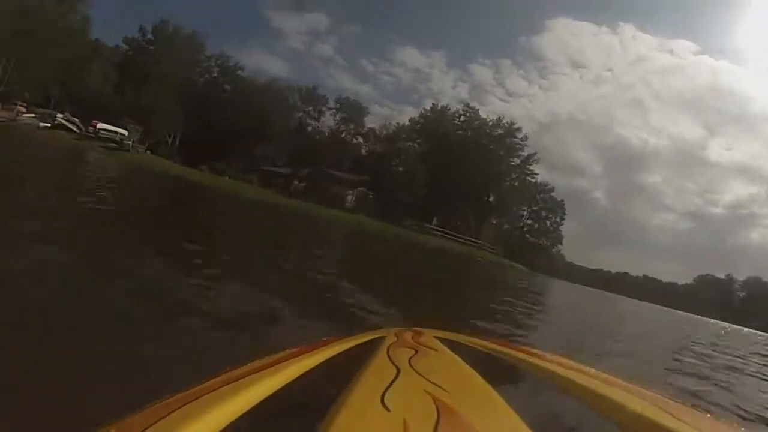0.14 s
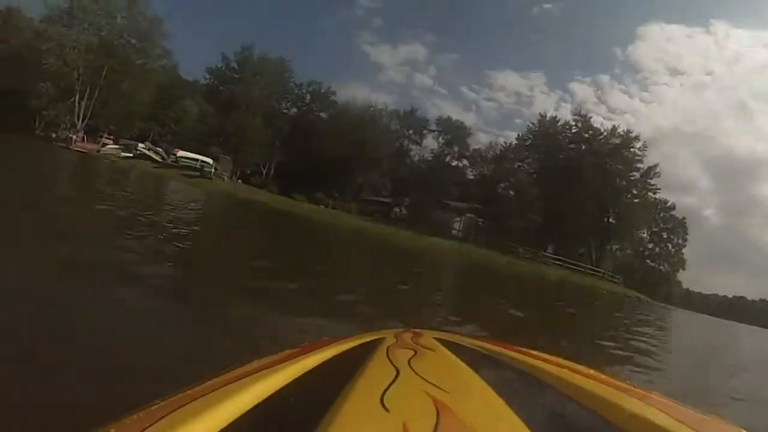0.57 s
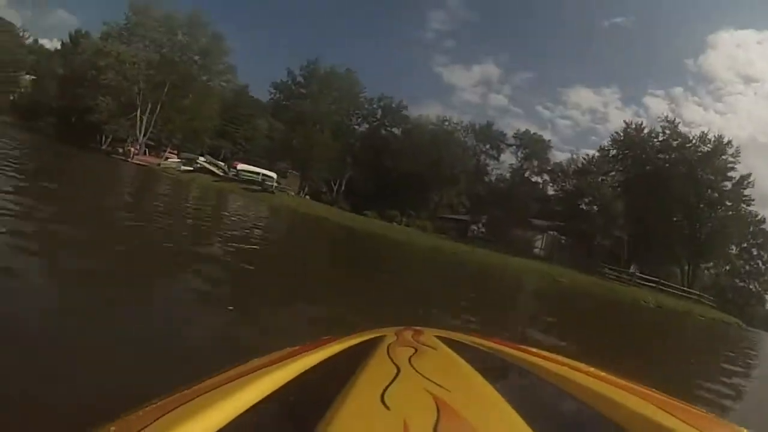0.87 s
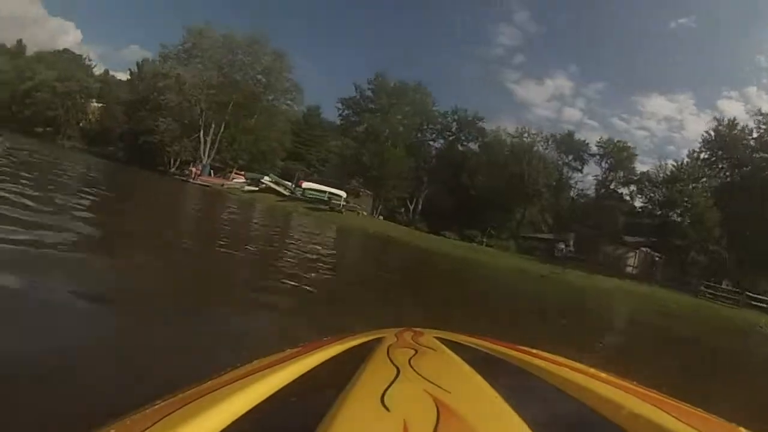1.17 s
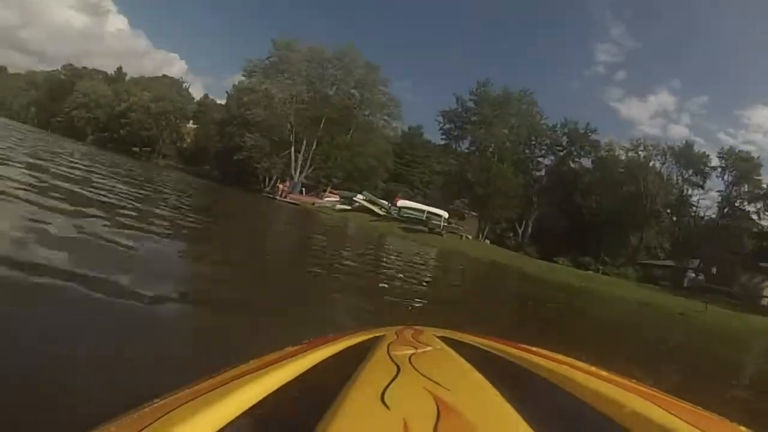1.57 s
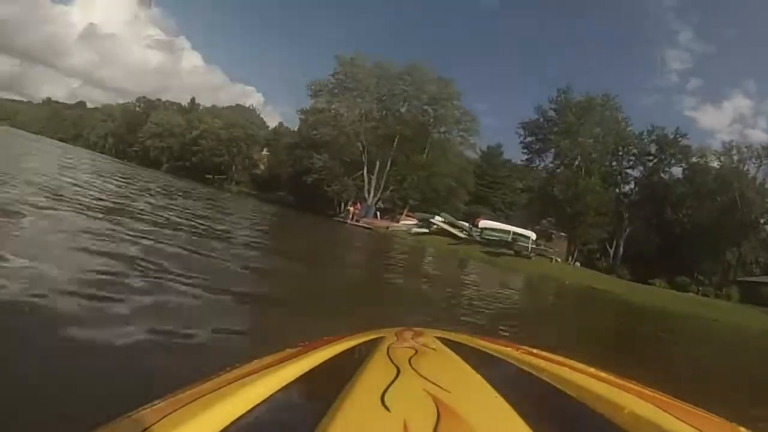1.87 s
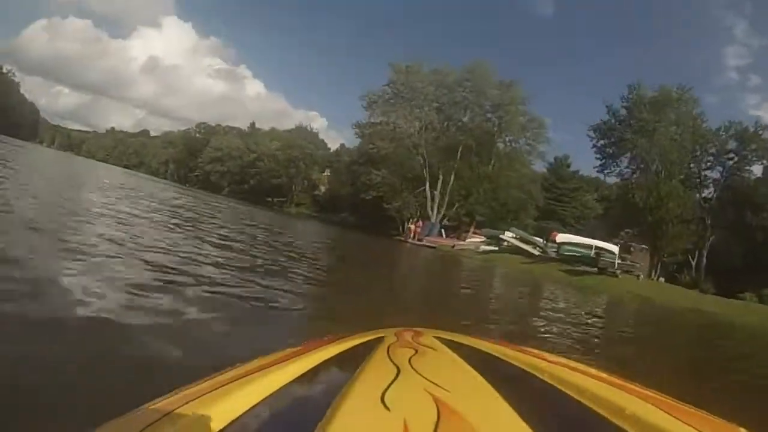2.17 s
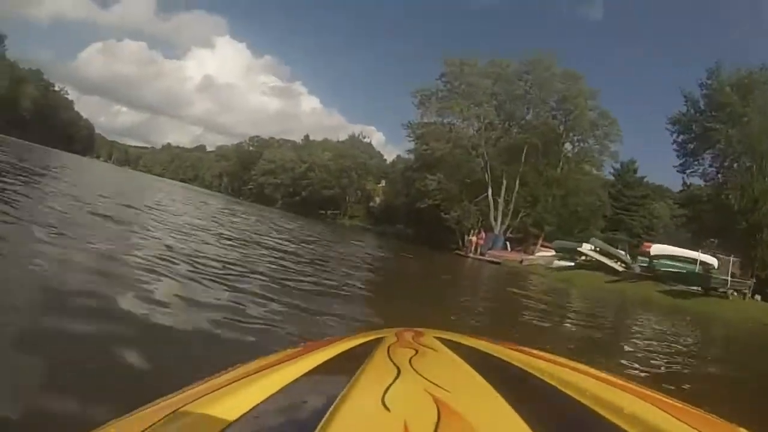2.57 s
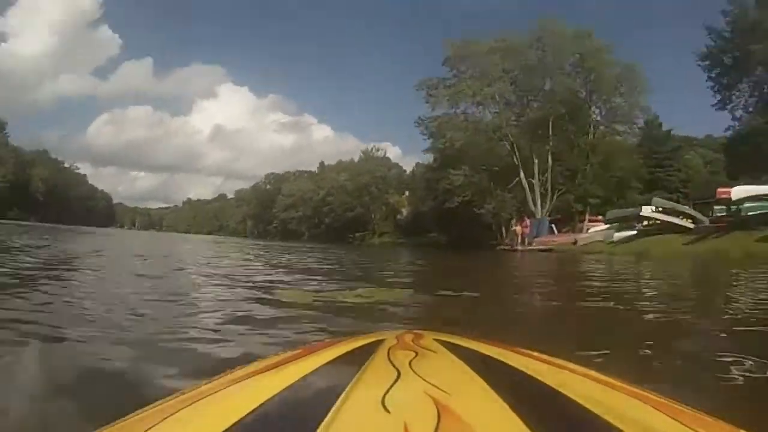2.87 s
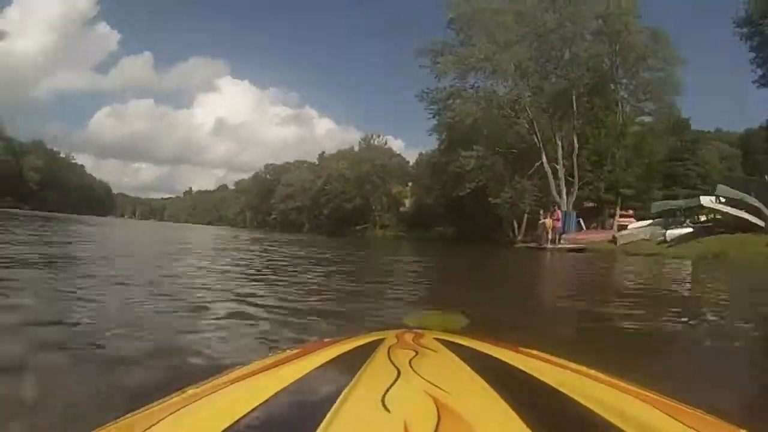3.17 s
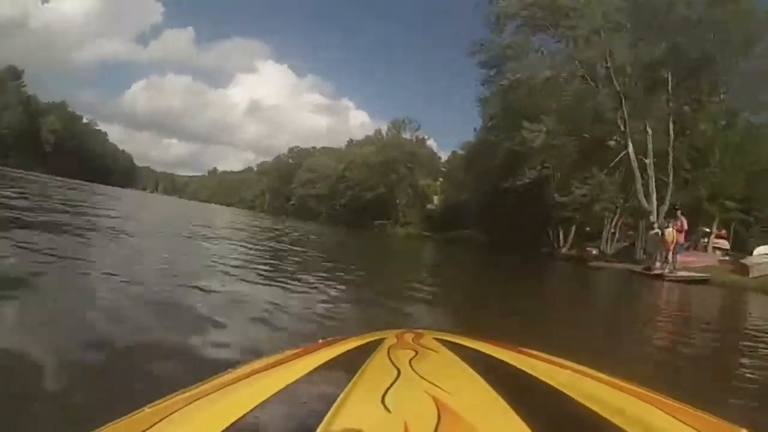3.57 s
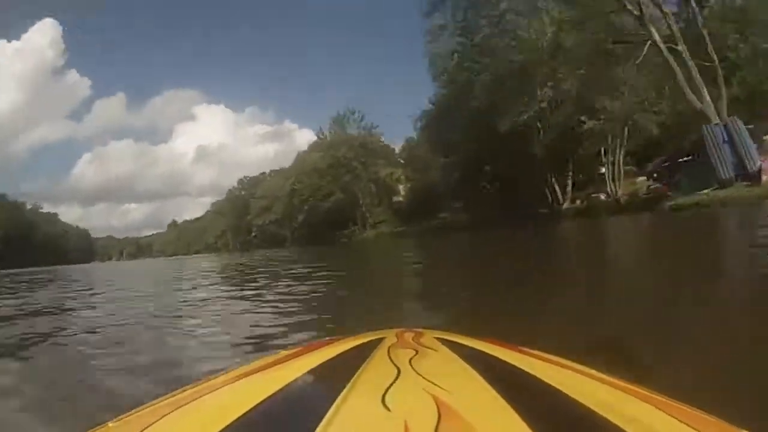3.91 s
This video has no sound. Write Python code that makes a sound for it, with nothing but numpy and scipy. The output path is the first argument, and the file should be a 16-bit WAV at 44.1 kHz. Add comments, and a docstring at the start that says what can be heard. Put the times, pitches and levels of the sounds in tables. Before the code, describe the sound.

An electric model boat motor hums and whines steadily with water slapping the hull, then jumps sharply in pitch and skips at full speed.

```python
"""An electric motor hums and whines in a model boat, heard on deck: it cruises, speeds up and skips over water.
Motor and drive shaft are fluttering sines at multiples of the motor and whirl rates, plus side tones.
The shaft's rattle is noise rung through the hull; the propeller fizzes in noise bursts once a turn, then hiss.
Filtered noise makes the wash, the buffeting and the ripples that slap the bow."""
import sys
import numpy as np
from scipy import signal
from scipy.fft import rfft, irfft
from scipy.io import wavfile
from scipy.ndimage import uniform_filter1d, minimum_filter1d

SR = 44100
rng = np.random.default_rng(int(sys.argv[2]) if len(sys.argv) > 2 else 0)


def materialize(psi):
    """Save the field psi as 16-bit PCM at rate SR to the path in sys.argv[1].

    A 1-D psi becomes a single channel; in a 2-D psi each row is a channel.
    """
    bounded = np.clip(np.atleast_2d(psi).T, -1, 1)
    quanta = np.round(bounded * 32767).astype(np.int16)
    wavfile.write(sys.argv[1], SR, quanta)


N = 178398
T = np.arange(N) / SR

# Motor rate before racing. Each row: time in seconds, turns per second in Hz.
MOTOR_HZ = [(0.0, 270), (0.17, 259.5), (0.37, 264.8), (0.44, 268.8), (0.76, 269.9), (0.98, 267.3),
            (1.11, 272.6), (1.7, 271.4), (1.84, 264.8), (1.98, 268.8), (2.08, 272.7), (2.28, 272.1),
            (2.36, 263), (2.52, 269.1), (2.7, 272.3), (2.77, 361.6), (2.89, 436), (2.94, 441), (3.0, 423.7),
            (3.2, 422), (3.45, 424.3), (3.75, 428.5), (4.05, 438)]
# Drive shaft whirl while cruising. Each row: time in seconds, rate in Hz.
CRUISE_WHIRL_HZ = [(0.0, 166), (0.22, 142.4), (0.7, 161.9), (1.26, 162.4), (1.7, 155.9), (2.0, 139.8),
                   (2.25, 150.9), (2.48, 129.3), (2.68, 148.9)]
# Propeller bite, heard as hum level. Each row: time in seconds, level in dB.
BITE_DB = [(0.0, -16.5), (0.7, -15.5), (1.4, -16.5), (2.3, -15.5), (2.6, -14), (2.85, -12.5), (3.3, -12.5),
           (4.05, -11.5)]
# Brief hum dips. Each row: start in seconds, length in seconds, depth in dB.
HUM_DIPS = [(0.225, 0.087, 9), (0.574, 0.026, 17), (0.767, 0.042, 14), (1.035, 0.075, 7),
            (1.501, 0.053, 17), (1.66, 0.072, 12)]
# Motor whine. Each row: time in seconds, gain in dB.
WHINE_DB = [(0.0, -23), (0.4, -25), (1.0, -20.5), (1.68, -20), (1.9, -23), (2.8, -22.5), (3.14, -19.5),
            (3.4, -19.5), (3.74, -17), (3.85, -21.5), (4.05, -15.5)]
# Drive tones. Each row: multiple of motor rate, multiple of whirl rate, relative level in dB cruising,
# relative level in dB at full speed.
DRIVE_TONES = [(1, 1, -20, -16), (2, 0, -5.5, -3.5), (2, 1, -13.5, -4.5), (3, -1, -23.5, -19),
               (3, 0, -9.5, -1), (3, 1, -41, -18), (4, -1, -36, -12.5), (4, 0, -6.5, -10), (4, 1, -18, -17),
               (5, -1, -13, -13), (5, 0, -24.5, -10.5), (6, -1, -15, -20), (6, 0, -35.5, -15.5),
               (6, 1, -16.5, -36), (7, -1, -52, -23), (7, 0, -34, -25.5), (8, 0, -24.5, -27.5),
               (8, 1, -37, -32), (9, -1, -48.5, -27.5), (9, 0, -24.5, -33.5)]
# Drive rattle in the hull. Each row: time in seconds, gain in dB.
RATTLE_DB = [(0.0, -22), (0.9, -21.5), (1.2, -22), (1.75, -21), (2.45, -24), (2.9, -21), (3.05, -24),
             (3.7, -21.5), (4.05, -23)]
# Ring of the hollow hull. Each row: frequency in Hz, relative density in dB per Hz.
HULL_SPECTRUM = [(600, -29.5), (970, -22.5), (1080, -4), (1200, -1), (1420, -3.5), (1600, -15),
                 (1760, -8.5), (1900, -7), (2200, -14.5), (2600, -19), (2850, -17), (3300, -27),
                 (3750, -27), (4300, -43), (5700, -41.5), (9000, -67), (14000, -79)]
# Propeller fizz. Each row: time in seconds, gain in dB.
FIZZ_DB = [(0.0, -45.5), (0.35, -45.5), (0.6, -47), (0.8, -44.5), (1.35, -42), (2.0, -45.5), (2.4, -46),
           (3.25, -38.5), (3.8, -40), (4.05, -38)]
# Bubble ticks. Each row: frequency in Hz, relative density in dB per Hz.
TICK_SPECTRUM = [(2500, 2), (4500, -13), (5400, -4), (6300, -4.5), (7200, 3.5), (8000, -3), (8800, -6),
                 (9500, -18.5), (10400, -11), (11300, -28), (12100, -18), (13100, -24), (14300, -36.5),
                 (15000, -38.5)]
# Bubble snaps and propeller hiss. Each row: frequency in Hz, relative density in dB per Hz.
FROTH_SPECTRUM = [(2500, 3.5), (4600, 2), (6200, -8.5), (7300, -3), (8700, -7), (9600, -14), (12200, -13.5),
                  (14800, -20)]
# Wash along the hull. Each row: frequency in Hz, relative density in dB per Hz.
WASH_SPECTRUM = [(25, -33), (60, -13), (120, 1.5), (190, 2.5), (250, 11.5), (320, 10), (400, -1.5),
                 (480, -3), (560, 9), (630, -2), (800, 8.5), (950, -4.5), (1300, -31.5), (3500, -69.5)]
# Low rumble of buffeting. Each row: frequency in Hz, relative density in dB per Hz.
RUMBLE_SPECTRUM = [(11, -7.5), (18, 3.5), (48, 6), (107, -2.5), (130, -11), (170, -39.5), (290, -120)]
# Chop against the hull. Each row: start in seconds, length in seconds, level in dB.
BUFFETS = [(0.018, 0.1, -28), (0.203, 0.27, -27), (0.518, 0.12, -20), (0.653, 0.09, -24), (1.93, 0.14, -28),
           (2.082, 0.13, -26.5), (3.4, 0.11, -24), (3.7, 0.096, -37), (3.96, 0.12, -28)]
# Ripples slapping the bow. Each row: start in seconds, relative peak in dB, length in seconds,
# spatter in dB against the slap before a common trim.
SLAPS = [(0.023, -4.5, 0.02, -33), (0.229, -7, 0.018, -35), (0.338, -1, 0.016, -39),
         (0.447, -4.5, 0.014, -35), (0.486, 0, 0.024, -40), (0.651, -5, 0.0246, -36),
         (0.7457, -7, 0.025, -41), (0.8768, 0.5, 0.02, -42), (1.003, -1.5, 0.021, -43),
         (1.272, -1, 0.019, -31), (1.481, -10, 0.018, -31), (1.6253, -4.5, 0.023, -38),
         (1.694, 2.5, 0.024, -29.5), (1.7487, -2, 0.02, -39), (1.959, -1.5, 0.021, -27),
         (2.121, -1, 0.026, -30), (2.179, -1, 0.022, -36), (2.4193, -3.5, 0.015, -44),
         (2.887, -8, 0.03, -28)]
# Slap knock. Each row: frequency in Hz, relative density in dB per Hz.
SLAP_SPECTRUM = [(700, -14), (1000, -10.5), (1250, 9), (1600, -6.5), (1900, -0.5), (2700, -23.5),
                 (4000, -32), (5500, -39), (7500, -42), (12000, -86)]
# Fine drops thrown by a slap. Each row: frequency in Hz, relative density in dB per Hz.
SPATTER_SPECTRUM = [(1500, -14.5), (3000, 7), (5300, -4.5), (6500, -10.5), (9000, -18.5), (14000, -34)]
# Overtones stirred by the torque jolt. Each row: multiple of motor rate, level in dB.
SURGE_TONES = [(2, -17.5), (3, -25)]
# Hull skips, propeller loses bite. Each row: start in seconds, length in seconds, peak loss of load in dB.
SKIPS = [(2.905, 0.035, 9), (2.994, 0.031, 6), (3.127, 0.035, 5.5), (3.205, 0.078, 10), (3.35, 0.12, 24.5),
         (3.55, 0.22, 18), (3.829, 0.1, 16), (3.927, 0.17, 12.5)]

CRUISE_HZ, FULL_HZ = 275, 425  # ends of the cruise-to-full blend
WHIRL_PER_MOTOR_TURN = 2 / 3  # whirl lock at full speed
RACE_HZ_PER_DB, RACE_S = 0.8, 0.04  # racing per dB of load lost; half-width of the bump
# drop in dB for each dB of load lost
FIZZ_DB_PER_DB, SHAFT_DB_PER_DB, WHINE_DB_PER_DB, RATTLE_DB_PER_DB = 0.93, 0.32, 0.21, 0.066
FIZZ_GAP_DB = 27  # bound on the fizz drop in a skip
SECOND_FADE_DB_PER_DB = 0.19  # second harmonic at take-off
SECOND_LATE_START_S, SECOND_LATE_LENGTH_S, SECOND_LATE_DB = 2.87, 0.15, 5  # its drop near full speed
CRUISE_WAVER_DB, FULL_WAVER_DB = 3.5, 3  # rms depth of random hum dips
SLAP_CHECK_DB = -10  # hum change per unit of knock force
PLANING_DB_PER_S, PLANING_EVEN_S = 3, 3.48  # clean tones gain on rattle and whirl; time of no change
WHISTLE_START_S, WHISTLE_LENGTH_S, WHISTLE_MULTIPLE, WHISTLE_DB = 3.02, 0.34, 10, -52
RUMBLE_FLOOR_DB = -33  # steady low rumble between blows
SURGE_START_S, SURGE_LENGTH_S = 2.72, 0.088
LIMIT = 0.8  # limiter ceiling, full scale 1
EDGE_HZ = 15000  # band limit


def amp(db):
    """Decibels to gain."""
    return 10 ** (np.asarray(db) / 20)


def unit(x):
    """Scales to rms 1."""
    return x / np.sqrt(np.mean(x ** 2) + 1e-20)


def curve(rows):
    """Interpolates a control table at every sample."""
    return np.interp(T, *np.transpose(rows))


def wander(hz):
    """Smooth random motion of rms 1, mostly below hz."""
    f = np.fft.rfftfreq(N, 1 / SR)
    lowpass = 1 / np.sqrt(1 + (f / hz) ** 4)
    return unit(irfft(rfft(rng.standard_normal(N)) * lowpass, N))


def colour(x, points):
    """Rings x through a causal minimum-phase filter of the given spectrum; rms 1."""
    hz, db = np.transpose(points)
    f = abs(np.fft.fftfreq(4096, 1 / SR))
    log_gain = np.log(amp(np.interp(np.log(f + 1), np.log(hz), db)))
    response = np.fft.ifft(np.exp(np.conj(signal.hilbert(log_gain)))).real
    fade = np.cos(np.linspace(0, np.pi / 2, len(f))) ** 2
    return unit(signal.oaconvolve(x, response * fade)[:N])


def swell(start_s, length_s, skew=0.54):
    """One arch from 0 to 1 and back; a skew under 1 makes it rise faster than it falls."""
    progress = np.clip((T - start_s) / max(length_s, 0.005), 0, 1)
    return np.sin(np.pi * progress ** skew)


def throttle():
    """0 when cruising, 1 at full speed."""
    return np.clip((curve(MOTOR_HZ) - CRUISE_HZ) / (FULL_HZ - CRUISE_HZ), 0, 1)


def by_speed(cruising, full):
    """Blends a cruising value into a full-speed one."""
    return cruising + (full - cruising) * throttle()


def unloading():
    """Load in dB that the propeller loses while the hull is in the air."""
    return sum(db * swell(start_s, length_s) for start_s, length_s, db in SKIPS)


def take_off():
    """A brief bump around the start of each skip, as high as its loss of load in dB."""
    return sum(db * np.exp(-((T - start_s) / RACE_S) ** 2) for start_s, _, db in SKIPS)


def knocks():
    """Relative force of the ripples against the bow."""
    return sum(amp(db) * swell(start_s, length_s, skew=0.85) for start_s, db, length_s, _ in SLAPS)


def planing():
    """Gain in dB of clean tone over rattle and whirl as the hull settles onto the plane."""
    return throttle() * PLANING_DB_PER_S * (T - PLANING_EVEN_S)


def rotation(hz, jitter):
    """Turns made by a shaft whose rate trembles a little."""
    return np.cumsum(hz * (1 + jitter * wander(30))) / SR


def tone(turns, rough, flutter_hz):
    """A sine of rms 1 overall whose height and phase flutter."""
    flutter = 1 + rough * (wander(flutter_hz) + 1j * wander(flutter_hz))
    return unit((flutter * np.exp(2j * np.pi * (turns + rng.random()))).real)


def hum(motor, whirl):
    """The propeller shakes the hull once a turn, as hard as it bites; the whirling shaft adds two lower notes."""
    dips_db = sum(db * swell(start_s, length_s) for start_s, length_s, db in HUM_DIPS)
    waver_db = by_speed(CRUISE_WAVER_DB, FULL_WAVER_DB) * abs(wander(16))
    bite_db = curve(BITE_DB) - unloading() - dips_db - waver_db + SLAP_CHECK_DB * knocks()
    propeller = amp(bite_db) * tone(motor, rough=by_speed(0.28, 0.19), flutter_hz=34.3)

    whirl_note = tone(whirl, rough=0.083, flutter_hz=25)
    difference_note = amp(by_speed(-14.5, -2.0)) * tone(motor - whirl, rough=0.22, flutter_hz=25)
    shaft_db = by_speed(-26.0, -29.0) + by_speed(1.3, 2.45) * wander(5.7)
    shaft_db = shaft_db - SHAFT_DB_PER_DB * unloading() - planing()
    return propeller + amp(shaft_db) * (whirl_note + difference_note)


def whine(motor, whirl):
    """Motor overtones with side tones where the whirl modulates them, and a thin high whistle."""
    tones, smooth_db = np.zeros(N), planing()
    for k, m, cruise_db, full_db in DRIVE_TONES:
        # higher overtones vary more and follow planing more, up to a bound
        sway_db = (smooth_db + 1.26 * wander(4.4)) * min(k / 3, 1.5)
        level_db = by_speed(cruise_db, full_db) + sway_db
        if k == 2:
            late_db = SECOND_LATE_DB * swell(SECOND_LATE_START_S, SECOND_LATE_LENGTH_S)
            level_db = level_db - SECOND_FADE_DB_PER_DB * take_off() - late_db
        rough = 0.1 + by_speed(0.008, 0.02) * k ** 2
        tones += amp(level_db) * tone(k * motor + m * whirl, rough=rough, flutter_hz=25.4)
    whistle = tone(WHISTLE_MULTIPLE * motor, rough=0.21, flutter_hz=26.5)
    whistle = amp(WHISTLE_DB) * swell(WHISTLE_START_S, WHISTLE_LENGTH_S) * whistle
    return amp(curve(WHINE_DB) - WHINE_DB_PER_DB * unloading()) * tones + whistle


def rattle(motor, whirl):
    """The shaft scrapes in its tube, hardest once per wobble and at each slap, and the hull rings."""
    wobble = 1 + by_speed(0.17, 0.3) * np.cos(2 * np.pi * (motor - whirl))
    scrape = rng.standard_normal(N) * wobble * amp(by_speed(1.66, 3.2) * wander(37))
    level_db = curve(RATTLE_DB) - planing() + by_speed(1.2, -1.3)
    level_db = level_db + 1.8 * knocks() - RATTLE_DB_PER_DB * unloading()
    return amp(level_db) * colour(scrape, HULL_SPECTRUM)


def fizz(motor):
    """Bubbles collapse off the propeller about once a turn; at full speed they merge into hiss."""
    turn = np.floor(motor + 0.044 * wander(150)).astype(int).clip(0)
    turn_start = np.searchsorted(np.maximum.accumulate(turn), turn)
    age_s = T - T[turn_start]
    size = (0.35 + rng.random(N) ** 2)[turn]  # one size for each turn
    ticks = colour(size * np.exp(-age_s / 0.0013) * rng.standard_normal(N), TICK_SPECTRUM)
    # single bubbles burst with a bright snap, about 45 a second
    snaps = colour(rng.standard_normal(N) * (rng.random(N) < 45 / SR), FROTH_SPECTRUM)
    hiss = colour(rng.standard_normal(N) * amp(1.8 * np.tanh(wander(400))), FROTH_SPECTRUM)

    bubbles = amp(by_speed(0.95, -4.5)) * ticks
    bubbles += amp(by_speed(-14.5, -24.0)) * snaps
    bubbles += amp(by_speed(-12.0, -1.0)) * hiss
    gap_db = FIZZ_GAP_DB * np.tanh(FIZZ_DB_PER_DB * unloading() / FIZZ_GAP_DB)
    return amp(curve(FIZZ_DB) - gap_db + 2.3 * wander(35)) * bubbles


def water():
    """Water washes along the hull in gurgling swells and buffets it with low rumble."""
    wash = colour(rng.standard_normal(N) * amp(2.0 * wander(65)), WASH_SPECTRUM)
    blows = sum(amp(db) * swell(start_s, length_s) for start_s, length_s, db in BUFFETS)
    push = amp(RUMBLE_FLOOR_DB) + blows
    rumble = colour(rng.standard_normal(N), RUMBLE_SPECTRUM)
    return amp(by_speed(-25.0, -29.0)) * wash + push * rumble


def slaps():
    """Each ripple knocks on the hollow bow and throws fine drops against it."""
    knock = amp(-11.5) * knocks() * colour(rng.standard_normal(N), SLAP_SPECTRUM)
    drops = sum(amp(db + spatter_db - 4.5) * swell(start_s, length_s)
                for start_s, db, length_s, spatter_db in SLAPS)
    return knock + drops * colour(rng.standard_normal(N), SPATTER_SPECTRUM)


def surge(motor):
    """A jolt of torque makes the low overtones bark as the motor spins up."""
    bark = sum(amp(db) * tone(k * motor, rough=0.16, flutter_hz=60.54) for k, db in SURGE_TONES)
    return swell(SURGE_START_S, SURGE_LENGTH_S) * bark


def scene():
    """Sums drive, propeller and water; the motor races around each take-off."""
    motor_hz = curve(MOTOR_HZ) + RACE_HZ_PER_DB * take_off()
    whirl_hz = by_speed(curve(CRUISE_WHIRL_HZ), WHIRL_PER_MOTOR_TURN * motor_hz)
    motor = rotation(motor_hz, jitter=0.002)
    whirl = rotation(whirl_hz, jitter=0.002)
    drive = hum(motor, whirl) + whine(motor, whirl) + rattle(motor, whirl) + surge(motor)
    return (drive + fizz(motor) + water() + slaps())[None]


def record(dry):
    """A limiter ducks the sharpest peaks; then soft ends and a band limit."""
    room = LIMIT / np.maximum(abs(dry), LIMIT)
    held = minimum_filter1d(room, size=300)
    gain = uniform_filter1d(uniform_filter1d(held, size=150), size=150)
    ends = signal.windows.tukey(N, 0.002)
    lowpass = signal.firwin(511, EDGE_HZ, window=("kaiser", 9), fs=SR)
    return signal.oaconvolve(dry * gain * ends, lowpass[None], "same")


dry = scene()
out = record(dry)
materialize(out)
```